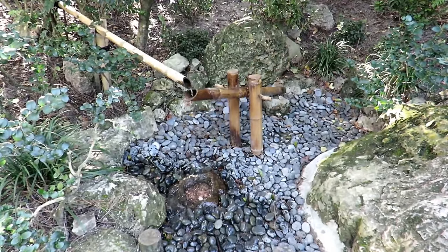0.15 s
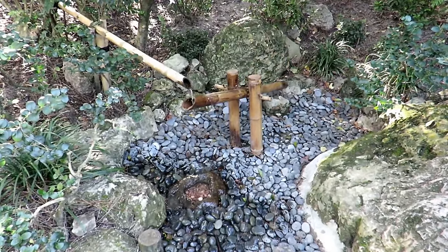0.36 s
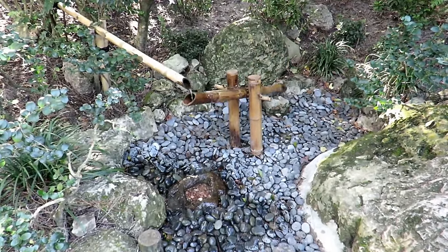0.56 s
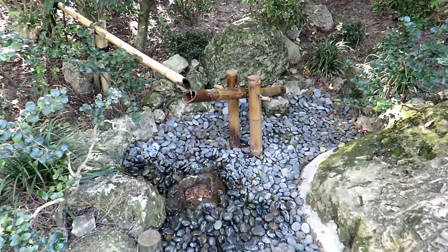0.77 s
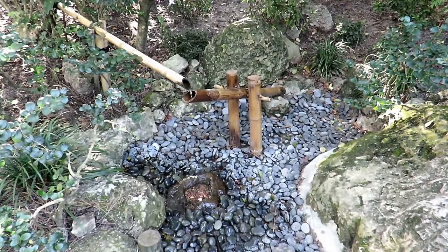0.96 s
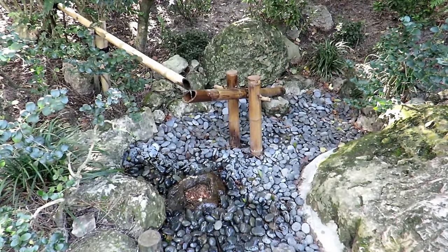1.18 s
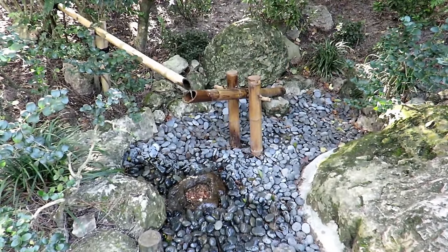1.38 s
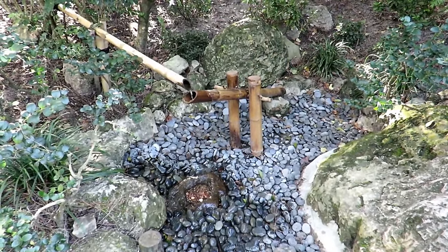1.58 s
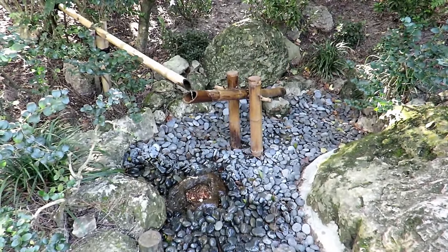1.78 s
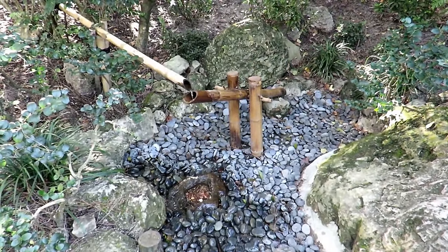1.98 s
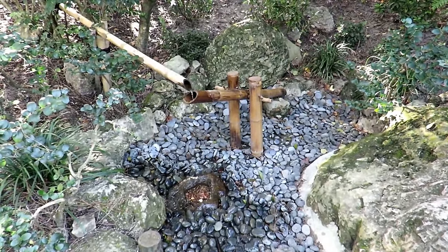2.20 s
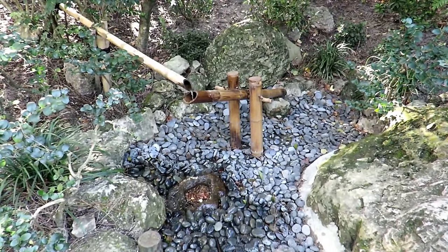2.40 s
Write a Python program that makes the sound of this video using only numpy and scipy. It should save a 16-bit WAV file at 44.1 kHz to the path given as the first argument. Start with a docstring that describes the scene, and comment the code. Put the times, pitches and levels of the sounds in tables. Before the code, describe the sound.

A bamboo water tipper gives one very loud, hollow, dry knock on stone at 0.23 seconds, with quick rock echoes. Before it, the last water spatters on pebbles, fading by 0.5. A faint dull bounce and rattle come at 0.62-0.8. Low water murmur swells, dropping abruptly at 1.4. A quiet songbird chirps from 0.3 to 1.9, with thin high calls, a distant dove at 0.6 and 2.36, and a clear warble at 2.3.

```python
"""A bamboo water tipper, just emptied, knocks hard on its stone, bounces once softly and rattles as it settles.
The tube, its air column and its wall ring as decaying sines under a crack of noise; the garden echoes the knock.
The last water spatters on pebbles as droplet pings; a low murmur of water, shaped noise, swells then drops abruptly.
Behind, gliding sines through the trees make a songbird's phrase, a thin high call and a clear warble.
A dove coos far off, in still air of shaped noise. Two microphones hear it, alike in the bass, wide in the treble."""
import sys
import numpy as np
from scipy import signal
from scipy.fft import rfft, irfft
from scipy.io import wavfile
from scipy.ndimage import uniform_filter1d

SR = 44100
rng = np.random.default_rng(int(sys.argv[2]) if len(sys.argv) > 2 else 0)


def bounce(signal):
    """Save signal as a 16-bit WAV file at the path given by the first command-line argument."""
    frames = np.transpose(np.atleast_2d(signal))
    limited = np.clip(frames, -1, 1)
    pcm = np.round(limited * 32767).astype(np.int16)
    wavfile.write(sys.argv[1], SR, pcm)


N = 108045  # samples


def amp(db):
    """Decibels to gain."""
    return 10 ** (np.asarray(db) / 20)


def evened(x):
    """Scales to rms 1."""
    return x / np.sqrt(np.mean(x ** 2) + 1e-20)


def read(points, hz):
    """Reads a curve over frequency, straight between points on a log axis."""
    f, value = np.transpose(points)
    return np.interp(np.log(hz + 1), np.log(f + 1), value)


def level(points):
    """A level curve as gain per sample."""
    return amp(np.interp(np.arange(N) / SR, *np.transpose(points)))


def add(mix, start_s, sound):
    """Mixes a sound in at a time, cut off at the end of the mix."""
    part = mix[..., round(start_s * SR):][..., :sound.shape[-1]]
    part += sound[..., :part.shape[-1]]


def filtered(x, order, hz, kind="low"):
    """Butterworth filter."""
    return signal.lfilter(*signal.butter(order, hz, kind, fs=SR), x)


def through(x, response):
    """Convolves one or two channels, keeping the length."""
    return signal.fftconvolve(np.atleast_2d(x), np.atleast_2d(response), axes=1)[:, :x.shape[-1]]


def colour(x, points, size=4096):
    """Causal minimum-phase filter with the given spectrum."""
    hz = abs(np.fft.fftfreq(size, 1 / SR))
    log_gain = np.log(amp(read(points, hz)))
    response = np.fft.ifft(np.exp(np.conj(signal.hilbert(log_gain)))).real
    return through(x, response[:size // 2])


# likeness of the left and right microphones: f/Hz, correlation (1 = identical)
MICROPHONE_LIKENESS = [(30, 0.23), (150, 0.35), (700, 0.28), (2000, 0.2), (5000, 0.19), (12000, 0.051)]


def pair(z):
    """Two unrelated channels become a microphone pair, more alike in the bass than in the treble."""
    a, b = rfft(z)
    same = read(MICROPHONE_LIKENESS, np.fft.rfftfreq(z.shape[1], 1 / SR))
    mid = a * np.sqrt((1 + same) / 2)
    side = b * np.sqrt((1 - same) / 2)
    return irfft(np.array([mid + side, mid - side]), z.shape[1])


def noise(count, width=1):
    """White noise at the two microphones, narrowed by width."""
    z = pair(rng.standard_normal((2, count)))
    middle = z.mean(0)
    return middle + width * (z - middle)


def tail(decay, width=1, rise_s=0.013):
    """One second of diffuse reflections, each band dying at its own speed."""
    hz, t, z = signal.stft(noise(SR, width), SR, nperseg=256)
    fade = amp(-60 * t / read(decay, hz)[:, None])
    rise = np.minimum(t / rise_s, 1)
    out = signal.istft(z * fade * rise, SR, nperseg=256)[1]
    return out / np.linalg.norm(out[0])


def ringing(modes):
    """One second of resonances, each a decaying sine."""
    t = np.arange(SR) / SR
    rise = np.minimum(t / 0.00045, 1)
    return rise * sum(amp(db - 60 * t / t60) * np.sin(2 * np.pi * hz * t) for hz, db, t60 in modes)


# hollow thump of the tube: f/Hz, level/dB within the blow, t60/s
THUMP_MODES = [(263, 5.5, 0.033), (196.4, -14, 0.035), (330, -14, 0.034)]
# ring of the bamboo wall: f/Hz, level/dB within the blow, t60/s
WALL_MODES = [(368, -34.5, 0.35), (494, -13.5, .12), (578, -27.5, 0.55), (683, -11.5, 0.079),
              (748.4, -15.5, 0.14), (850, -19.5, 0.1165), (1123, -15.5, 0.14), (1259, -8.5, 0.1),
              (1335, -14, 0.16), (1426, -8.5, 0.076), (1725, -18, 0.1), (1858, -14, 0.067),
              (2052, -10, 0.027), (2523, -22.5, 0.097)]
# long ring of the air column: f/Hz, level/dB before each blow's column gain, t60/s
COLUMN_MODES = [(135.8, -37.5, 0.99), (274, -26.5, 0.47), (290, -42, 0.5)]
# colour of the dense, short ring of the contact: f/Hz, relative level/dB per Hz
CRACK_COLOUR = [(60, -28), (400, 2.5), (1000, 4.5), (2000, 0), (2900, -4.5), (3500, -24), (4200, -12.5),
                (6000, -24), (9000, -26), (16000, -46)]
CRACK_DB, CRACK_T60_S, CRACK_RISE_S = -5.5, 0.056, 0.0004
# colour of the first hard snap of bamboo on stone: f/Hz, relative level/dB per Hz
SNAP_COLOUR = [(300, -21), (1500, 7.5), (3000, 4.5), (4800, -5), (6500, -26), (16000, -40)]
SNAP_DB, SNAP_PEAK_S = -14.5, 0.00051


def blow(level_db, dull_hz, column_db, width=0.18):
    """One blow: modes ring under a noisy crack that opens with a snap; each blow has its own dullness."""
    t = np.arange(SR) / SR
    ring = ringing(THUMP_MODES + WALL_MODES) + amp(column_db) * ringing(COLUMN_MODES)
    grain = rng.standard_normal(SR) + width * rng.standard_normal((2, SR))
    crack_fade = amp(CRACK_DB - 60 * t / CRACK_T60_S) * np.minimum(t / CRACK_RISE_S, 1)
    crack = evened(colour(grain, CRACK_COLOUR)) * crack_fade
    snap_pulse = t / SNAP_PEAK_S * np.exp(1 - t / SNAP_PEAK_S)
    snap = amp(SNAP_DB) * evened(colour(grain, SNAP_COLOUR)) * snap_pulse
    return [amp(level_db) * filtered(part, 1, dull_hz) for part in (ring, crack + snap)]


# blows of the tube on its rest: t/s, level/dB, dull above f/Hz, gain of the air column/dB
TUBE_BLOWS = [(0.2323, -15, 1800, 5), (0.2356, -1, 7105, -0.5), (0.6191, -32, 1080, 24)]
# echoes from rocks and walls: delay t/s, level/dB before the echo filters, smear t/s
ROCK_ECHOES = [(.0115, -0.5, 0.0013), (.029, -7.5, 0.0033), (.083, -23.5, 0.021)]
ECHO_LOW_HZ, ECHO_HIGH_HZ, ECHO_RING_DB, ECHO_WIDTH = 610, 7000, -5.5, 0.35
# decay of the garden's tail: f/Hz, t60/s
GARDEN_DECAY = [(120, .65), (300, .42), (1300, .35), (3000, .25), (8000, .2), (15000, .15)]
# colour of the garden's tail: f/Hz, filter level/dB
GARDEN_TONE = [(100, -29.5), (280, -22), (600, -20), (1400, -21), (3000, -16.5), (7000, 1), (12000, -30)]


def tipper():
    """The blows with their echoes and the garden's tail; the narrow tube radiates no deep bass."""
    ring, crack, echoes = np.zeros((3, 2, N))
    for start_s, db, dull_hz, column_db in TUBE_BLOWS:
        blow_ring, blow_crack = blow(db, dull_hz, column_db)
        add(ring, start_s, blow_ring)
        add(crack, start_s, blow_crack)
    t = np.arange(SR // 10) / SR
    for delay_s, db, smear_s in ROCK_ECHOES:
        scatter = noise(len(t), ECHO_WIDTH) * np.exp(-t / smear_s)
        smeared = through(crack, scatter / np.linalg.norm(scatter[0]))
        add(echoes, delay_s, amp(db) * (amp(ECHO_RING_DB) * ring + smeared))
    echoes = filtered(filtered(echoes, 2, ECHO_LOW_HZ, "high"), 1, ECHO_HIGH_HZ)
    garden = colour(through(ring + crack, tail(GARDEN_DECAY, width=0.2)), GARDEN_TONE)
    low_cut = signal.butter(4, 149, "high", fs=SR, output="sos")  # Hz
    return signal.sosfilt(low_cut, ring + crack + echoes + garden)


# brief rattle after the bounce: t/s, level/dB
RATTLE_LEVEL = [(.615, -80), (.63, -48), (.665, -45), (.69, -42.5), (.72, -52), (.78, -69), (.85, -110)]
# colour of the rattle: f/Hz, relative level/dB per Hz
RATTLE_COLOUR = [(50, -24), (125, 6), (190, -9), (280, 4), (420, -4), (700, -5.5), (1000, -9), (1350, -4),
                 (1800, -25), (4000, -25), (12000, -43)]
TAPS_PER_S = 880


def settling():
    """Tiny quick taps of the tube on its rest: random impulses through a fixed colour."""
    taps = rng.standard_normal(N) * (rng.random(N) < TAPS_PER_S / SR)
    return evened(colour(taps, RATTLE_COLOUR)) * level(RATTLE_LEVEL)


# loud splats on the pebbles: t/s, level/dB before the common splat gain, starting f/Hz
PEBBLE_SPLATS = [(.006, -36, 6200), (0.0159, -28.5, 1970), (0.0245, -33, 5230), (0.022, -34.5, 2900),
                 (0.036, -34, 4760), (.058, -34, 2500), (0.0626, -32.5, 2930), (.109, -33.5, 2450),
                 (0.1244, -30, 2100), (0.144, -32, 1591), (0.178, -31, 2340)]
SPLAT_DB, SPLAT_T60_S, SPLAT_HISS = -2, 0.037, 0.67
SPLAT_RISE_PER_S = 4.4  # pitch rise as a fraction of the starting pitch


def splats():
    """Each splat is a rising, dying sine with a band of hiss around its pitch."""
    out = np.zeros((2, N))
    t = np.arange(SR // 20) / SR
    for start_s, db, hz in PEBBLE_SPLATS:
        hiss = evened(filtered(noise(len(t), 0.17), 2, [hz / 2, hz * 1.2], "band"))
        ping = np.sin(2 * np.pi * hz * (t + SPLAT_RISE_PER_S * t ** 2 / 2))
        fade = amp(SPLAT_DB + db - 60 * t / SPLAT_T60_S) * np.minimum(t / 0.0005, 1)
        add(out, start_s, (ping + SPLAT_HISS * hiss) * fade)
    return out


DROPS_PER_S, DROP_SPREAD_DB = 4000, 3.8  # drops at each microphone, all pitches together


def droplets(count=28):
    """Short pings of many pitches, each pitch with its own sparse rain of drops."""
    t, out = np.arange(SR // 40) / SR, np.zeros((2, N))
    for hz in np.geomspace(700, 14000, count):
        hits = rng.random((2, N)) < DROPS_PER_S / count / SR
        sizes = np.zeros((2, N))
        sizes[hits] = amp(DROP_SPREAD_DB * np.minimum(rng.exponential(1, hits.sum()), 3))
        peak_s = 2 / hz  # the swell peaks after two cycles
        ping = np.sin(2 * np.pi * hz * t) * t * np.exp(-t / peak_s)
        out += np.sqrt(hz) * evened(through(sizes, ping))
    return evened(pair(out))


# colour of the spilling water: f/Hz, relative level/dB per Hz
SPILL_COLOUR = [(24, -36), (40, -4), (117, -14), (183, -2), (342, -14.5), (438, -10), (1160, -17),
                (2220, -18.5), (2990, -25), (3740, -25), (5300, -25), (15500, -45.5)]
# its fading away: t/s, level/dB
SPILL_FADE = [(0, -34), (.03, -39.5), (.08, -38.5), (.15, -40.5), (.22, -41), (.33, -48.5), (.5, -59),
              (.8, -117)]


def spill():
    """The last water: dense droplets over a low gush and a wash of noise."""
    gush = filtered(noise(N), 2, 700)
    mix = droplets() + 1.05 * gush + 0.7 * noise(N)
    return evened(colour(mix, SPILL_COLOUR)) * level(SPILL_FADE)


# colour of the low murmur of running water: f/Hz, relative level/dB per Hz
MURMUR_COLOUR = [(30, -8.5), (80, -1), (150, 1.5), (230, -0.5), (400, -8.5), (1200, -11), (2500, -21.5),
                 (6000, -32), (15000, -53)]
# its swell and abrupt drop: t/s, level/dB
MURMUR_LEVEL = [(0, -50), (.55, -54.5), (.8, -53.5), (1.0, -51.5), (1.15, -50), (1.3, -48), (1.4, -48),
                (1.44, -65.5), (2.45, -66.5)]


def murmur():
    """Running water as coloured noise whose level moves."""
    return evened(colour(noise(N), MURMUR_COLOUR)) * level(MURMUR_LEVEL)


def note(length_s, db, from_hz, to_hz, waver, size=60):
    """One gliding whistle that swells and fades, its pitch wavering with noise averaged over size samples."""
    u = np.arange(0, length_s, 1 / SR) / length_s
    wobble = evened(uniform_filter1d(rng.standard_normal(SR), size))[:len(u)]
    hz = from_hz * (to_hz / from_hz) ** u * (1 + waver * wobble)
    swell = np.sqrt(abs(np.sin(np.pi * u)))
    return amp(db) * evened(swell * np.sin(2 * np.pi * np.cumsum(hz) / SR))


def phrase(notes, waver, size=60):
    """A run of notes; a note with no second pitch holds its first."""
    out = np.zeros(N)
    for start_s, length_s, db, from_hz, *to_hz in notes:
        add(out, start_s, note(length_s, db, from_hz, to_hz[0] if to_hz else from_hz, waver, size))
    return out


# rising slurs: t/s, length t/s, level/dB before the dry and wet gains, from f/Hz, to f/Hz
RISING_SLURS = [(0.325, 0.033, -54, 5400, 5880), (0.355, 0.089, -55, 4030, 4270),
                (.435, 0.042, -53.5, 4940, 5900), (0.598, 0.074, -52, 4124, 4900),
                (0.751, 0.051, -50.5, 4105, 4943), (0.897, 0.065, -51.5, 4030, 4800),
                (1.049, 0.056, -49.5, 4020, 4890), (1.2, .06, -50, 4024, 4640),
                (1.422, 0.025, -54.5, 2897, 4440), (2.263, .04, -59.5, 3300, 4150)]
# falling notes: t/s, length t/s, level/dB before the dry and wet gains, from f/Hz, to f/Hz
FALLING_NOTES = [(0.471, .05, -49.5, 4300, 3070), (0.659, 0.044, -52, 4200, 3040),
                 (.815, 0.039, -49.5, 4300, 2880), (0.965, 0.019, -46.5, 4200, 3040),
                 (1.122, 0.038, -51.5, 4300, 2970), (1.283, 0.039, -50.5, 4500, 3010),
                 (1.399, 0.039, -47, 4600, 2829), (1.508, 0.024, -48.5, 4700, 2810),
                 (1.602, .028, -48.5, 4800, 2883), (1.711, 0.03, -49.5, 4700, 2790),
                 (1.808, 0.023, -49, 4900, 2823), (1.902, 0.035, -51.5, 4700, 2895)]


def songbird():
    """A phrase of rising slurs and falling notes, with a rough pitch."""
    return phrase(RISING_SLURS + FALLING_NOTES, waver=0.028)


# clear warble ending in an up-and-down whistle: t/s, length t/s, direct level/dB, from f/Hz, to f/Hz
WARBLE_NOTES = [(2.277, 0.0328, -58, 3110, 3530), (2.31, 0.0235, -71, 3570, 3000),
                (2.339, .046, -58, 2850, 4740), (2.393, 0.026, -53.5, 4416, 3290),
                (2.411, 0.039, -58.5, 3340, 2600)]


def warbler():
    """A clearer warble with a steadier pitch."""
    return phrase(WARBLE_NOTES, waver=0.012)


# thin high calls: t/s, length t/s, level/dB before the dry and wet gains, f/Hz
HIGH_CALLS = [(.43, 0.12, -67, 7550), (.97, 0.081, -67, 7530), (1.364, 0.11, -67.5, 7270),
              (1.718, 0.14, -70.5, 7364), (2.143, 0.087, -70, 7430)]


def high_caller():
    """A repeated thin call that holds one pitch but for its waver."""
    return phrase(HIGH_CALLS, waver=0.0263)


# distant coos: t/s, length t/s, level/dB, f/Hz
DOVE_COOS = [(.56, 0.4, -57, 475), (2.36, 0.18, -58.5, 481)]


def dove():
    """A dove far off: low, slowly wavering whistles."""
    return phrase(DOVE_COOS, waver=0.011, size=900)


SONG_DRY_DB, WARBLE_WET_DB = -8, -4
TREES_T60_S = 0.42


def birds():
    """Song, call and warble reach the microphones direct and scattered by the trees; the dove direct only."""
    song, warble = songbird(), warbler()
    song += high_caller()
    direct = dove() + warble + amp(SONG_DRY_DB) * song
    scatter = tail([(1000, TREES_T60_S), (8000, TREES_T60_S)], rise_s=0.012)
    return direct + through(song + amp(WARBLE_WET_DB) * warble, scatter)


# colour of the garden's still air: f/Hz, relative level/dB per Hz
AIR_COLOUR = [(15, -28), (25, -4), (64, 0), (130, -5.5), (211, -2.5), (268, -4), (654, -0.5), (928, -1.5),
              (1120, -4.5), (2140, -12), (3300, -11), (5080, -19), (7210, -21), (11700, -26.5),
              (15800, -35)]


def still_air():
    """The steady background as coloured noise."""
    return amp(-52) * evened(colour(noise(N), AIR_COLOUR))


def scene():
    """Everything over the still air of the garden, a little louder at the right microphone."""
    air = still_air()
    knock = tipper() + settling()
    water = spill() + splats() + murmur()
    return (knock + water + birds() + air) * amp([[-0.3], [0.3]])


def record(dry):
    """The knock overloads the recorder, which rounds off its peaks; then the band limit."""
    knee = 6  # higher is a harder corner
    clipped = dry / (1 + abs(dry) ** knee) ** (1 / knee)
    band_limit = signal.firwin(511, 15800, window=("kaiser", 9), fs=SR)  # Hz
    return signal.oaconvolve(clipped, band_limit[None], "same")


dry = scene()
out = record(dry)
bounce(out)
```